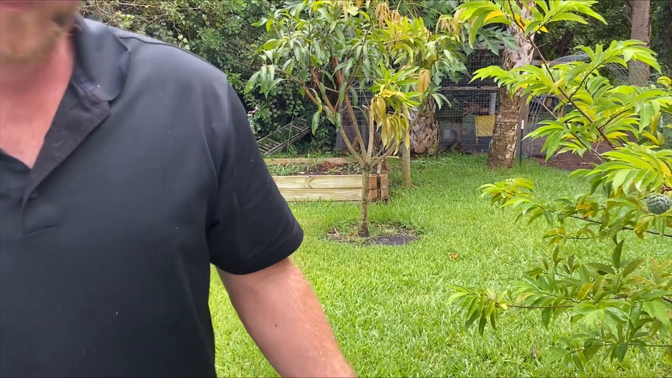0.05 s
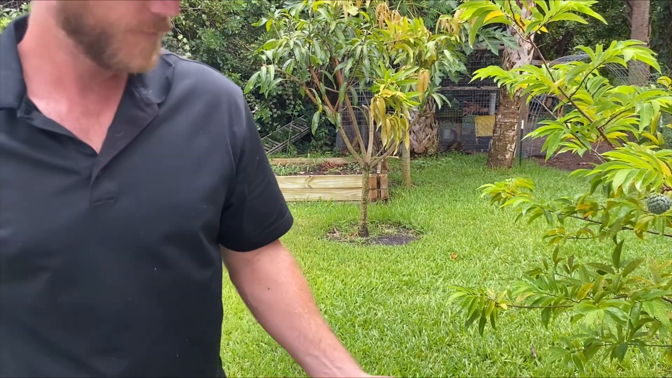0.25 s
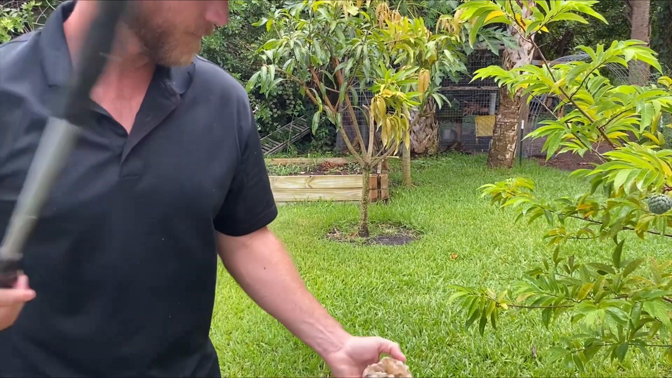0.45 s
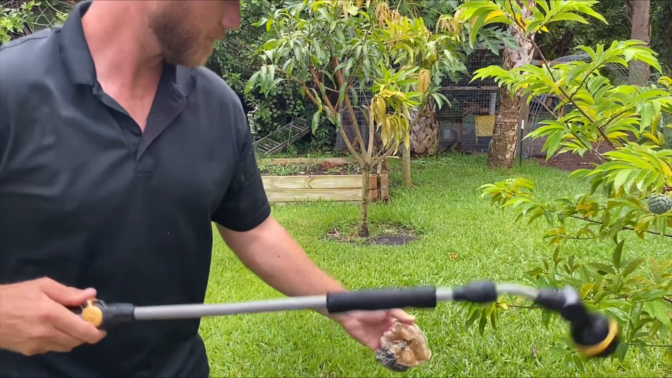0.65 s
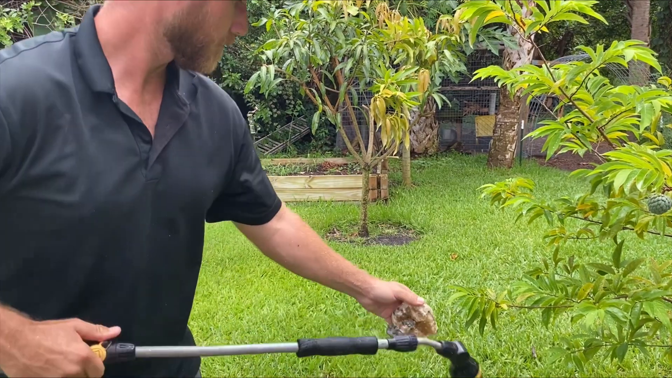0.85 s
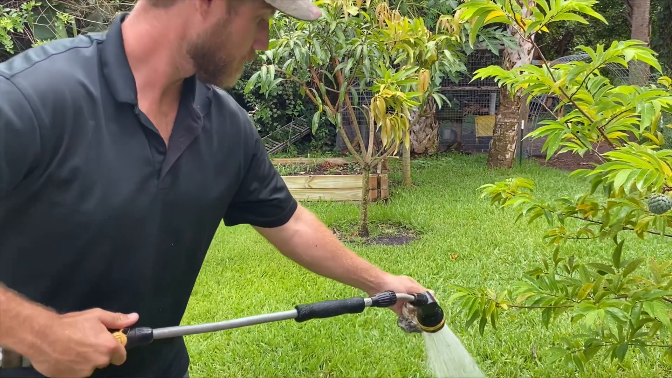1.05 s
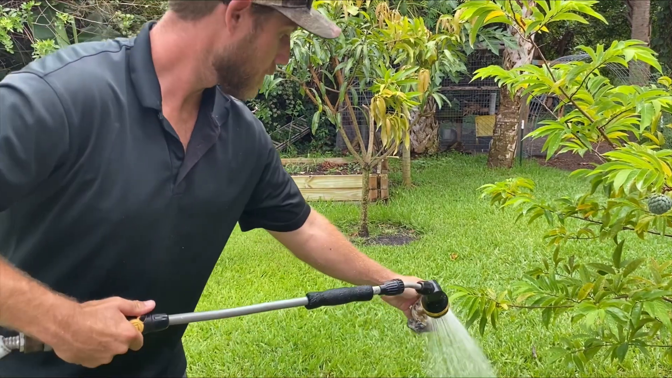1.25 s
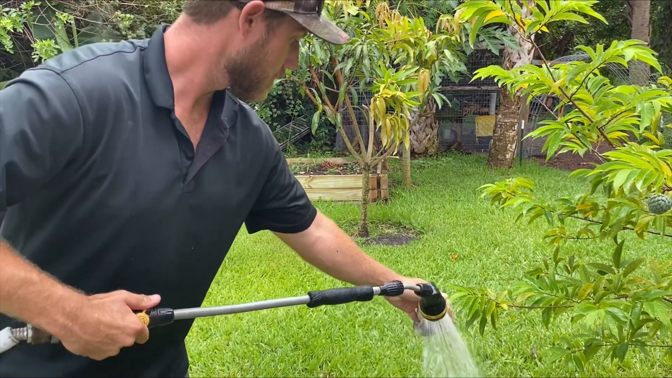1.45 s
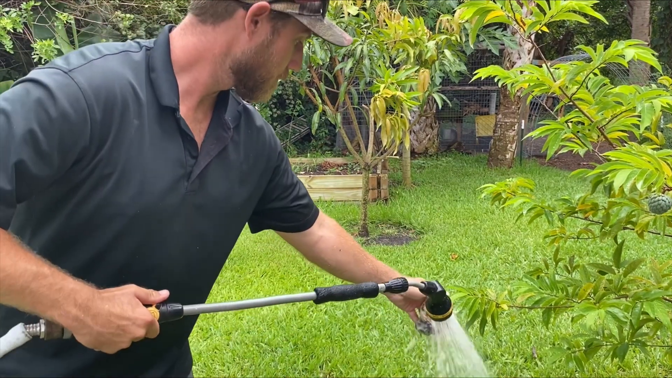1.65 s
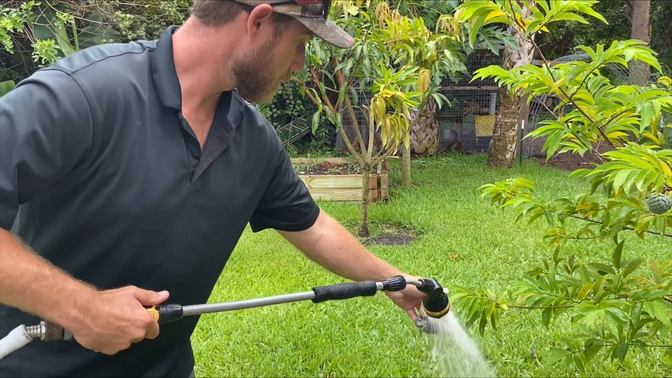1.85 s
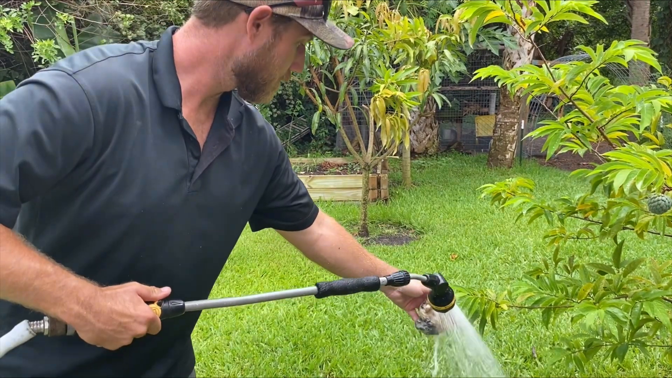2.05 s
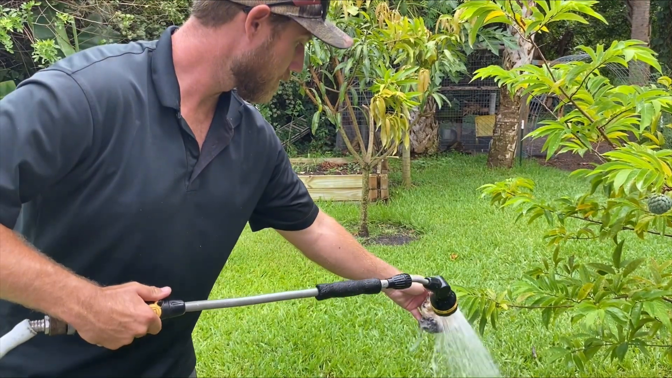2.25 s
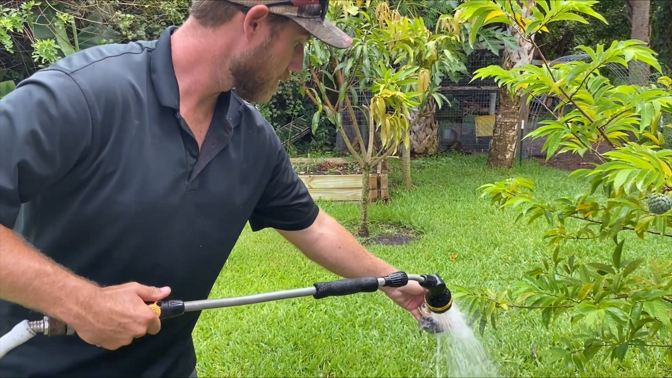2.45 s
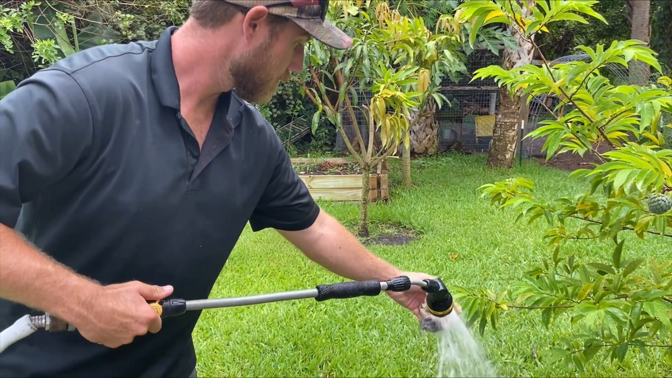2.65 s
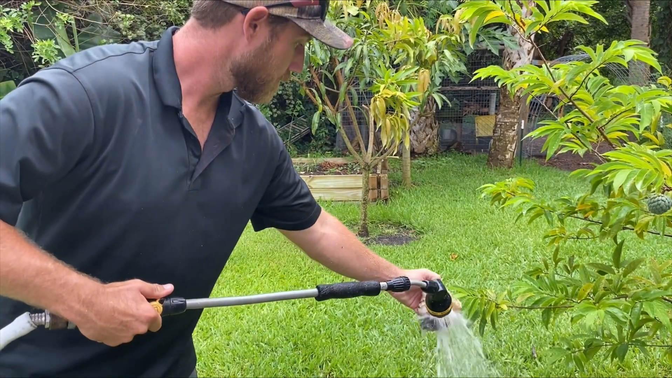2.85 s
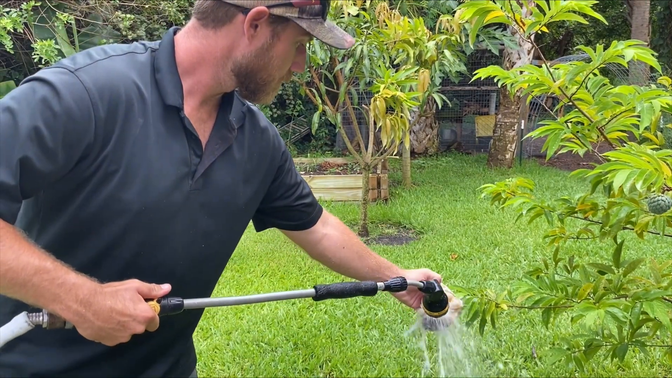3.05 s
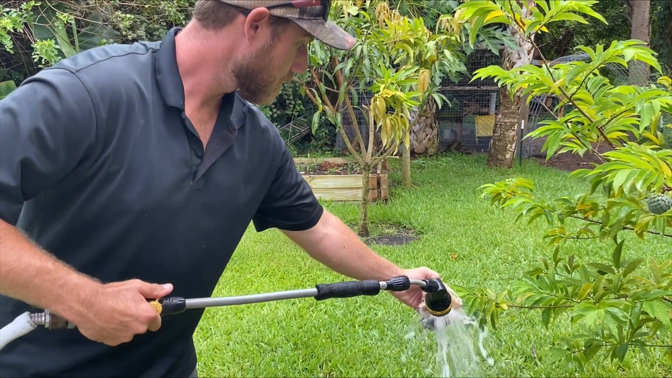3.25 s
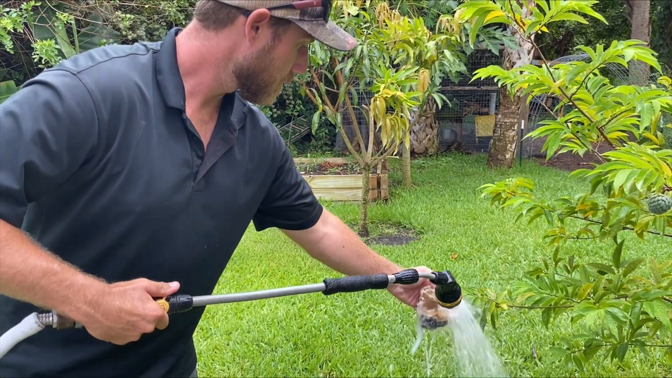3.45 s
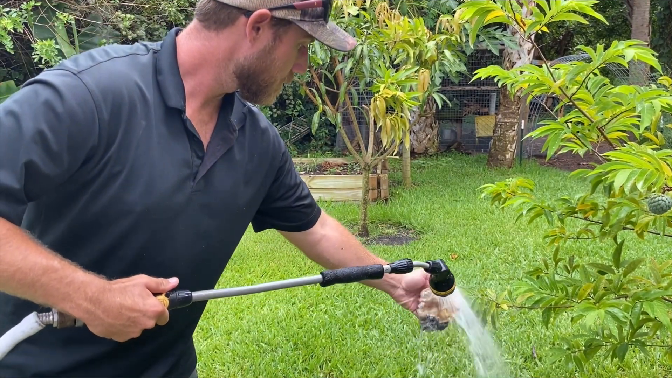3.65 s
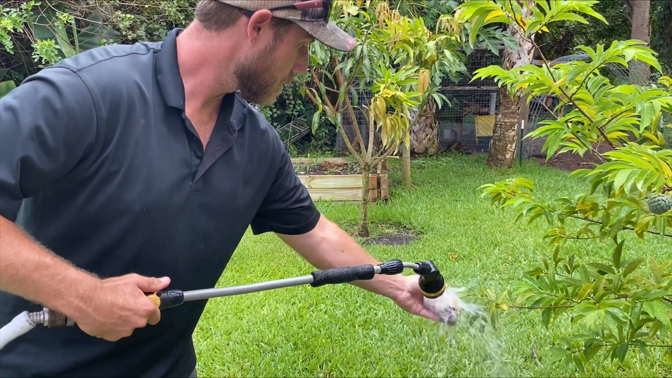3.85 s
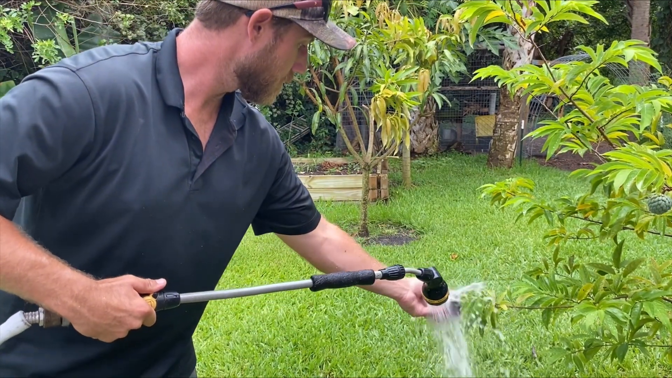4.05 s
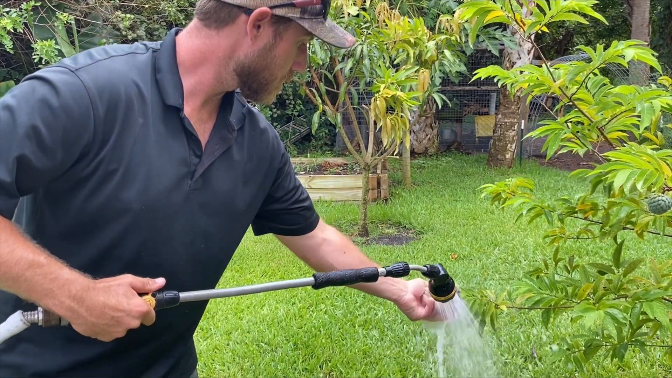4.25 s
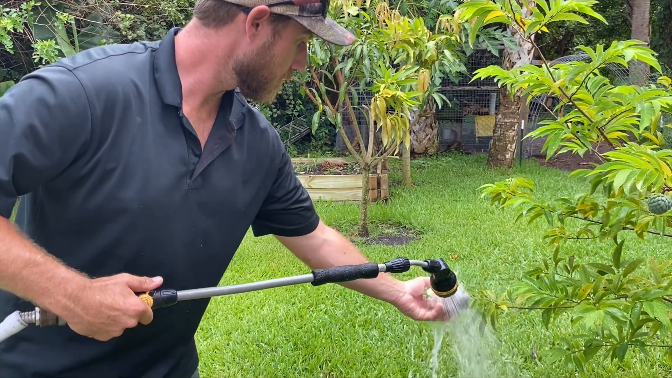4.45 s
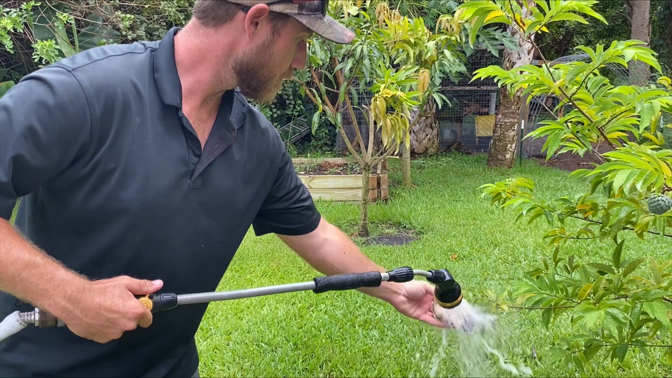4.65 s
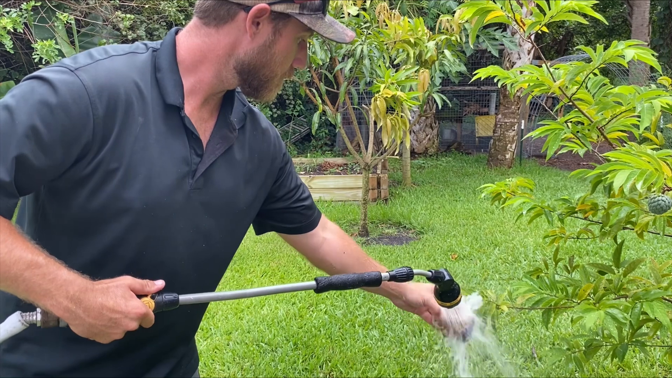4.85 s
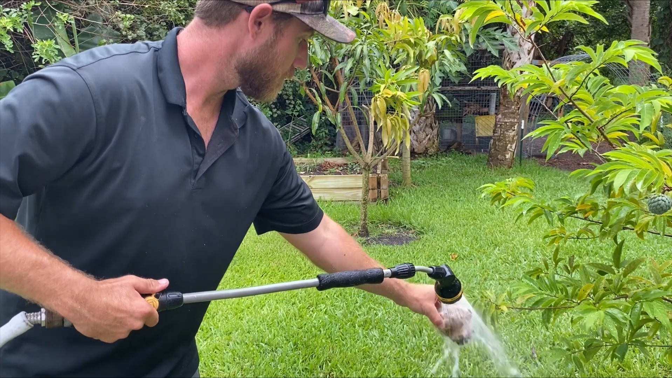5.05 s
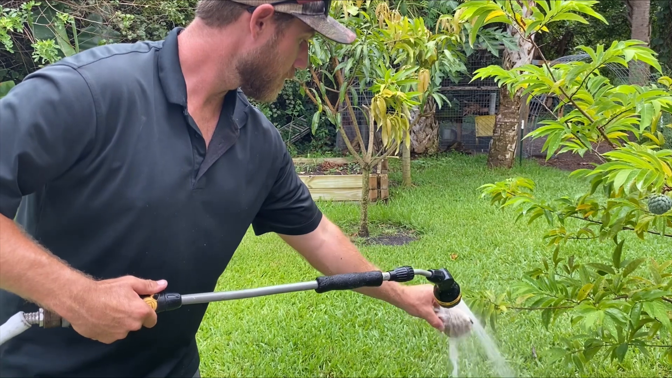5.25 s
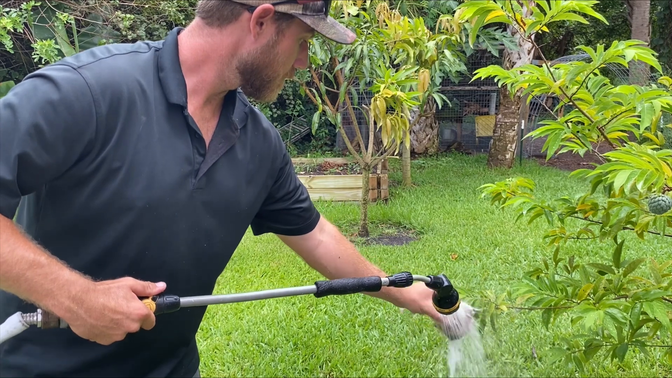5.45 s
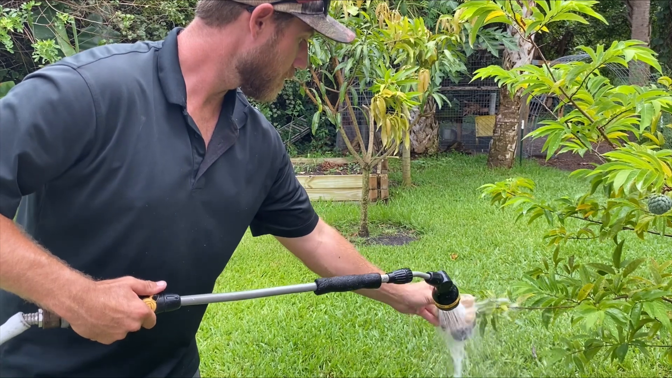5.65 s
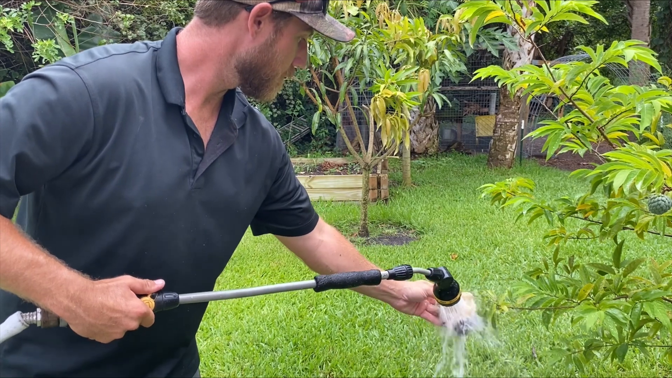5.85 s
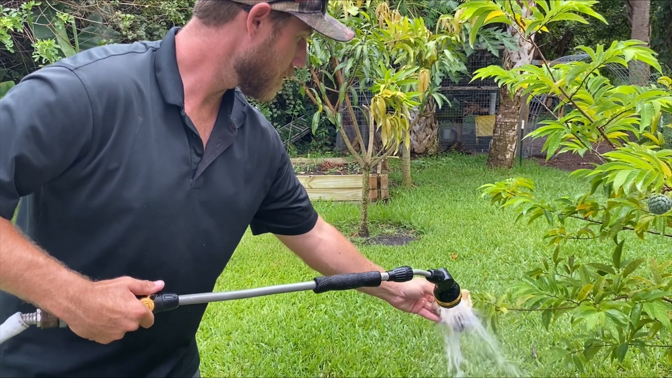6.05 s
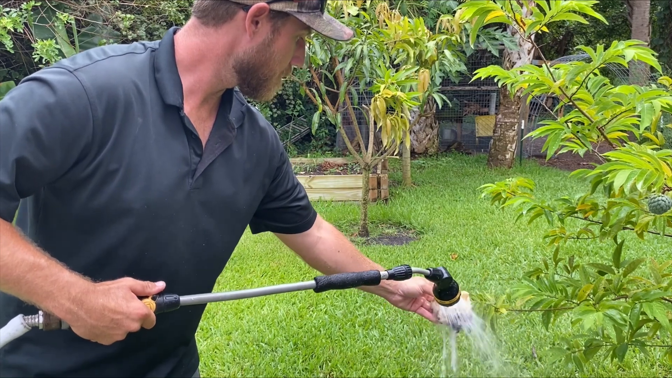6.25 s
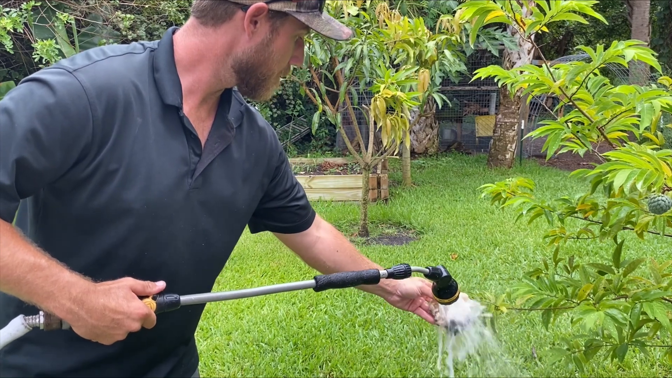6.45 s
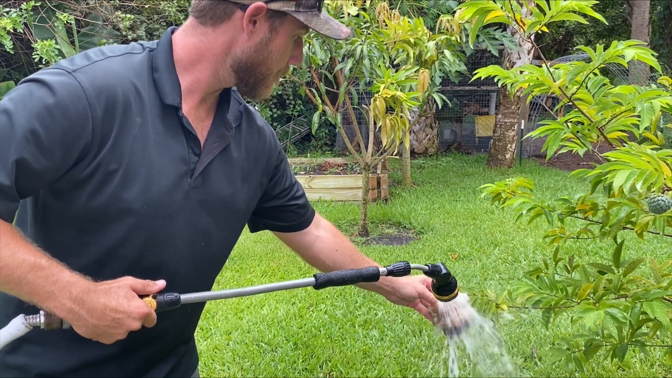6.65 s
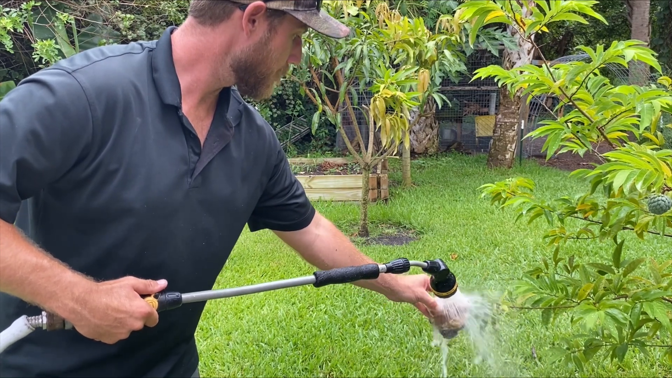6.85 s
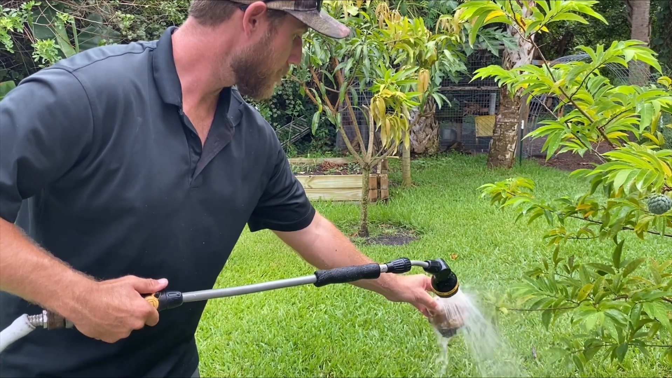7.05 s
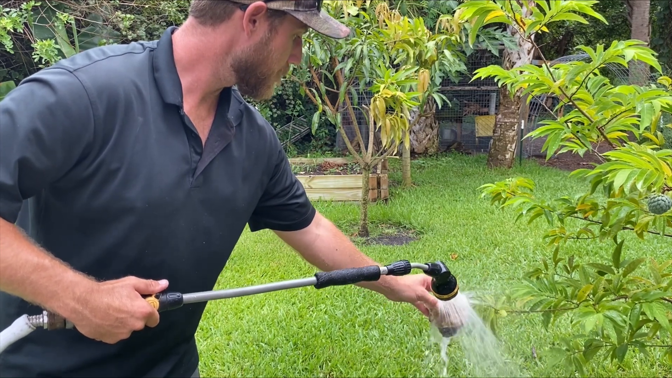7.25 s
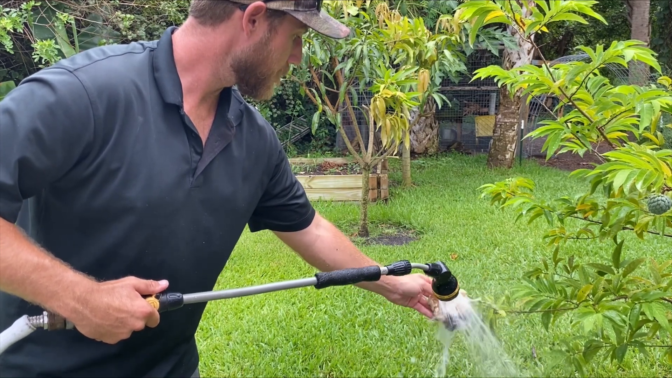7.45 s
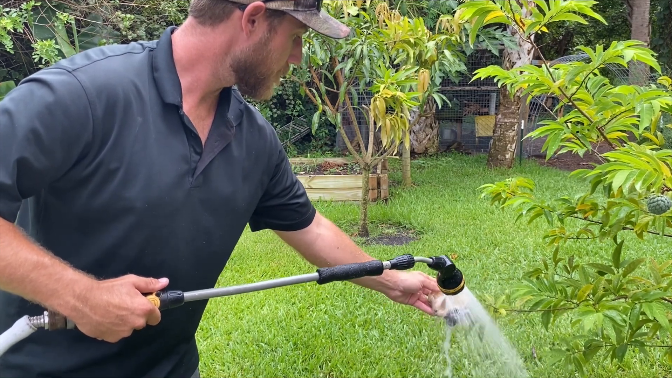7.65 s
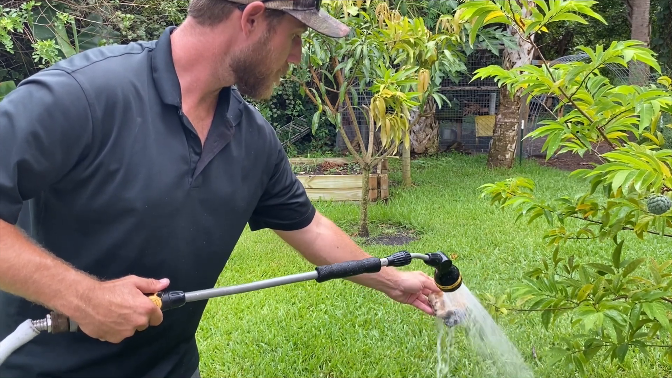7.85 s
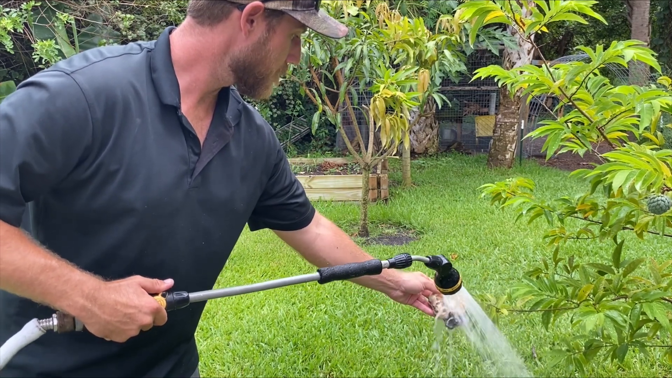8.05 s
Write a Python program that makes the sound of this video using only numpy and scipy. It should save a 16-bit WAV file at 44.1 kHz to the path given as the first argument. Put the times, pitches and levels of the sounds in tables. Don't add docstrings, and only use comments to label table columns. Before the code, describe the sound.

After soft lawn steps, trapped air spits and whistles from a hose wand, then a steady shower splashes unevenly over a hand, with pinging drops.

```python
import sys
import numpy as np
from scipy import signal
from scipy.fft import rfft, irfft, next_fast_len
from scipy.io import wavfile
from scipy.ndimage import uniform_filter1d, map_coordinates

SR = 44100
rng = np.random.default_rng(int(sys.argv[2]) if len(sys.argv) > 2 else 0)


def master_out(mix):
    frames = np.transpose(np.atleast_2d(mix))
    ceiling = np.clip(frames, -1, 1)
    pcm = np.round(ceiling * 32767).astype(np.int16)
    wavfile.write(sys.argv[1], SR, pcm)


def to_linear_factor(level_db):
    exponent = np.asarray(level_db, float) / 20
    return 10 ** exponent


N = 357210
SECONDS = np.arange(N) / SR
OPEN_S = 0.675
APART = np.array([[1], [-1]])


def unit(x):
    return x / np.sqrt(np.mean(x ** 2) + 1e-20)


def along(points, hz):
    f, v = np.transpose(points)
    return np.interp(np.log(hz + 1), np.log(f + 1), v)


def curves(rows):
    s, *cols = np.transpose(rows)
    return [np.interp(SECONDS, s, c) for c in cols]


def every_sample(v):
    return np.interp(np.arange(N), np.linspace(0, N, len(v)), v)


def wobble(rate):
    knots = rng.standard_normal(int(N * rate / SR) + 4)
    return map_coordinates(knots, [np.arange(N) * rate / SR])


def filtered(x, response):
    m = next_fast_len(N + 8192)
    return irfft(rfft(x, m) * response(np.fft.rfftfreq(m, 1 / SR)), m)[..., :N]


def coloured(pair, spectrum):
    return unit(filtered(pair, lambda hz: to_linear_factor(along(spectrum, hz))))


def patchy(patchy_db, size=(6, 8)):
    z = signal.stft(rng.standard_normal((2, N)), nperseg=512)[2]
    field = uniform_filter1d(rng.standard_normal(z.shape[1:]), size[0], axis=0)
    field = uniform_filter1d(field, size[1], axis=1)
    return unit(signal.istft(z * to_linear_factor(patchy_db * unit(field)), nperseg=512)[1][:, :N])


def impacts(count, spread_db, life_s):
    at, rank = rng.random((2, count))
    hits = np.bincount((at * N).astype(int), to_linear_factor(-spread_db * np.log(rank + .015)), N)
    return unit(signal.lfilter([1], [1, -np.exp(-1 / (life_s * SR))], hits))


def pings(rows, cycles, rise, onset, rough):
    out, k = np.zeros(N + 2048), np.arange(2048)
    grit = uniform_filter1d(rng.standard_normal(N + 2048), size=5) * 2
    for s, db, hz in rows:
        turns = hz * k / SR
        shape = np.exp(-turns / cycles) * (1 - np.exp(-turns / onset))
        tone = np.sin(2 * np.pi * turns * (1 + rise * turns))
        out[round(s * SR):][:2048] += to_linear_factor(db) * tone * shape
    return (out * (1 + rough * grit))[:N]


def bursts(starts, lengths, attack_s, release_s):
    t = np.arange(0, N, 32) / SR - np.array(starts)[:, None]
    return np.clip(t / attack_s, 0, 1) * np.clip(1 - (t - np.array(lengths)[:, None]) / release_s, 0, 1)


def total_db(floor_db, db, shapes):
    power = to_linear_factor(2 * floor_db) + to_linear_factor(2 * db) @ shapes ** 2
    return every_sample(10 * np.log10(power))


# (time [s], peak level [dB], frequency [Hz])
STALKS = [(0.048, -63, 2000), (0.0555, -45, 3600), (0.0774, -61, 1680), (0.1022, -52, 3040),
          (0.1172, -46, 2600), (0.1244, -49, 2900), (0.132, -52, 4300), (0.1502, -41.5, 2120),
          (0.174, -51, 4500), (0.2063, -55, 3500), (0.2166, -40.5, 2830), (0.227, -54, 3300),
          (0.24, -50, 1900), (0.258, -45, 3000), (0.287, -51, 1800), (0.2994, -52, 4660),
          (0.4335, -52, 1250), (0.516, -58, 2200), (0.059, -50, 5200), (0.064, -55, 8000)]
# (time [s], level [dB])
BRUSHING = [
    (0, -57),
    (.1, -58),
    (.2, -56),
    (.3, -55),
    (.38, -62),
    (.55, -67.5),
    (.67, -56.5),
]


def lawn():
    brush = patchy(2.5) * (.9 + .3 * impacts(count=3000, spread_db=2.5, life_s=.001))
    brush = coloured(brush, [(600, -1.0), (2500, -13.5), (6000, -8.0), (16000, -7.0)])
    snaps = pings(STALKS, cycles=1.1, rise=.06, onset=.25, rough=.3)
    overtones = np.multiply(STALKS, [1, 1, 1.7])
    snaps = snaps + .8 * pings(overtones, cycles=1.2, rise=.03, onset=.3, rough=.3)
    return to_linear_factor(curves(BRUSHING)[0] - 4) * brush * (SECONDS < OPEN_S) - to_linear_factor(1.5) * snaps


# (frequency [Hz], level [dB per Hz])
RUMBLE_SPECTRUM = [(16, -38), (28, -23), (54, 2), (86, -1.5), (140, -5), (199, -17.5), (330, -32),
                   (430, -44), (730, -120)]
TRAFFIC_DB, TRAFFIC_SWAY_DB = -55.5, -1.5


def traffic():
    level_db = TRAFFIC_DB + 4.0 + TRAFFIC_SWAY_DB * wobble(5.4)
    return to_linear_factor(level_db) * coloured(patchy(0.13), RUMBLE_SPECTRUM)


# (time [s], frequency [Hz], peak level [dB])
ENGINE_SWELLS = [(.17, 70, -52), (.52, 72, -50.5), (1.05, 72, -64), (1.22, 81, -54), (1.6, 74, -60),
                 (2.0, 75, -56), (2.92, 73, -52.5), (3.33, 65.5, -51.5), (3.7, 68, -55.5), (4.7, 60, -53.5),
                 (5.6, 68, -51.5), (6.4, 68, -54.5), (7.0, 68, -52), (7.6, 69, -55), (8.0, 70, -55)]
SWELL_S, IDLE_DB = .12, -56


def engine():
    s, hz, db = np.transpose(ENGINE_SWELLS)
    swells = np.exp(-((np.arange(0, N, 32) / SR - s[:, None]) / SWELL_S) ** 2)
    hz = np.interp(SECONDS, s, hz) + 2.26 * wobble(6)
    return to_linear_factor(total_db(IDLE_DB, db + 5.5, swells)) * np.sin(2 * np.pi * np.cumsum(hz) / SR)


# (time [s], level [dB])
FAN_LEVEL = [
    (0, -55),
    (.8, -54),
    (1.3, -53),
    (1.8, -69),
    (3.2, -57),
    (3.6, -67.5),
    (8.1, -64),
]


def fan():
    sway = 1 + .5 * wobble(8.9)
    hz = 127 + 2.52 * wobble(3.3)
    return to_linear_factor(curves(FAN_LEVEL)[0]) * sway * np.sin(2 * np.pi * np.cumsum(hz) / SR)


# (frequency [Hz], level [dB per Hz])
INSECT_SPECTRUM = [(6200, -26), (6700, -3), (7050, 7), (7350, -5), (7800, -42)]


def insects():
    level_db = -64.5 + 0.42 * wobble(49) + 0.36 * wobble(5.9)
    return to_linear_factor(level_db) * coloured(patchy(2.9), INSECT_SPECTRUM)


# (time [s], level [dB])
AIR_LEVEL = [
    (0, -65),
    (.35, -63.5),
    (.5, -70.5),
    (.65, -62),
    (1.0, -55),
    (1.3, -57),
    (8.1, -56),
]
# (frequency [Hz], level [dB per Hz])
AIR_SPECTRUM = [(150, 5), (350, -4.5), (860, -2), (1400, -5), (2400, -11), (5000, -19), (9000, -12.5),
                (16000, -29)]


def distant_air():
    return to_linear_factor(curves(AIR_LEVEL)[0]) * coloured(patchy(1.95), AIR_SPECTRUM)


def yard():
    return traffic() + (engine() + fan()) * np.array([[1], [.3]]) + insects() + distant_air()


# (start [s], length [s], strength [dB], wetness [dB], fine mist [dB])
AIR_SPURTS = [
    (0.669, 0.035, -39.5, -20, -13),
    (0.703, 0.029, -44, -7, -9),
    (0.736, 0.015, -48, 1, -6),
    (0.754, 0.031, -41, -4, -12),
    (0.789, 0.026, -43.5, -3.5, -15),
    (0.819, 0.047, -51, -4, -19),
    (0.908, 0.04, -51.5, -2.5, -15),
    (0.988, 0.23, -55, -15, -21),
]
SPURT_ATTACK_S, SPURT_RELEASE_S = 0.0017, 0.012


def with_spurts(db, offset):
    start, length, strength_db, wet_db, fine_db = np.transpose(AIR_SPURTS)
    spurts = bursts(start, length, SPURT_ATTACK_S, SPURT_RELEASE_S)
    spurt_db = total_db(-99, strength_db + offset(wet_db, fine_db), spurts)
    return 10 * np.log10(to_linear_factor(2 * db) + to_linear_factor(2 * spurt_db))


# (time [s], level [dB])
JET_FLOW = [(0.95, -60), (0.97, -64), (1.49, -51.5), (1.95, -55.5), (2.62, -52.5), (4.0, -48.5),
            (4.08, -52), (4.65, -45), (4.79, -50), (4.87, -45), (5.17, -49.5), (5.87, -44.5), (6.03, -48.5),
            (6.98, -46.5), (7.02, -49.5), (7.5, -48.5), (7.78, -50.5), (8.1, -48)]
# (start [s], length [s], mist change [dB], spray change [dB])
OBJECT_TILTS = [(.94, 0.036, 0, 2), (1.13, 0.22, 2.5, 1.5), (1.356, 0.036, -3, 1.5), (1.524, 0.057, 4, 2),
                (1.72, 0.12, 1.5, -3), (2.03, 0.13, 4, -1), (2.38, 0.15, 2.5, -4.5), (2.92, .1, -1, 3),
                (3.06, 0.088, -1.5, 0), (3.36, .05, 1, 1), (3.496, 0.064, -2, -4), (3.7, 0.22, 0, 4),
                (4.06, .09, 2, 0), (4.18, .05, -0.5, -2), (4.48, 0.18, -1, 2.5), (5.07, .06, 0.5, -2),
                (5.15, .24, 0, 0), (5.583, 0.099, -2.5, -4), (6.22, .07, 2, -2), (6.52, 0.11, 0, 1),
                (6.765, 0.22, 1, -0.5), (7.24, .04, 1, -2), (7.345, .04, 3.5, 0), (7.42, .09, -1, 0),
                (7.857, 0.11, 0.5, 1.5)]
FULL_FLOW_DB, USUAL_SPLASH_DB, TILT_EASE_S = -47, -48, 0.023
MIST_DB, MIST_FOLLOWS_SPLASH = -48.5, 0.096
SPRAY_DB, SPRAY_FOLLOWS_FLOW, SPRAY_FOLLOWS_SPLASH = -51, 0.19, 0.4


def breakup_levels(splash_db):
    flow_db = curves(JET_FLOW)[0] - FULL_FLOW_DB
    extra_db = splash_db - USUAL_SPLASH_DB
    start, length, *tilt_db = np.transpose(OBJECT_TILTS)
    tilt_db = tilt_db @ bursts(start, length, TILT_EASE_S, TILT_EASE_S)
    mist_db = MIST_DB + flow_db + MIST_FOLLOWS_SPLASH * extra_db + every_sample(tilt_db[0])
    spray_db = SPRAY_DB + SPRAY_FOLLOWS_FLOW * flow_db + SPRAY_FOLLOWS_SPLASH * extra_db
    spray_db = spray_db + every_sample(tilt_db[1])
    return with_spurts(mist_db, lambda wet, fine: fine), with_spurts(spray_db, lambda wet, fine: 0)


# (frequency [Hz], level [dB per Hz])
MIST_SPECTRUM = [(300, -21), (1000, -25.5), (2000, -10.5), (3500, -7.5), (6500, -6.5), (8600, -0.5),
                 (11500, -0.5), (14000, 3), (17000, 3)]


def mist(level_db):
    grains = 5.0 + 0.8 * impacts(count=12000, spread_db=3.0, life_s=0.0003)
    return to_linear_factor(level_db + 12.0) * coloured(patchy(1.7) * grains, MIST_SPECTRUM)


# (frequency [Hz], level [dB per Hz])
SPRAY_SPECTRUM = [(2500, -36), (4500, -9), (5300, -0.5), (6400, -8), (7500, -4.5), (9500, -1.5),
                  (14000, -18)]


def spray(level_db):
    grains = 0.5 + 0.38 * impacts(count=6000, spread_db=4.5, life_s=0.002)
    return to_linear_factor(level_db + 3.5) * coloured(patchy(1.97) * grains, SPRAY_SPECTRUM)


# (start [s], length [s], splash level [dB], cup resonance [Hz])
OBJECT_DIPS = [(1.18, 0.14, -49.5, 3800), (1.315, 0.065, -45.5, 4060), (1.434, 0.027, -44, 3600),
               (1.603, 0.062, -43.5, 3820), (1.702, 0.18, -45.5, 3400), (2.011, 0.12, -45.5, 3560),
               (2.151, 0.057, -42, 3900), (2.273, 0.12, -44, 3650), (2.433, 0.25, -44, 3620),
               (2.66, 0.43, -44.5, 3470), (3.095, 0.23, -43, 3560), (3.392, 0.3, -52, 3650),
               (3.68, 0.11, -52.5, 3780), (3.764, 0.27, -46.5, 3200), (4.046, 0.15, -48.5, 3100),
               (4.248, 0.12, -48.5, 3720), (4.476, 0.25, -46, 3520), (4.763, 0.3, -51, 3400),
               (5.27, 0.1, -50, 3780), (5.473, 0.12, -51, 3440), (5.56, 0.29, -48, 3200),
               (5.847, 0.2, -47.5, 3400), (5.99, 0.17, -44.5, 3400), (6.15, 0.26, -44.5, 3180),
               (6.377, 0.32, -45.5, 3280), (6.685, 0.14, -59, 3800), (7.288, 0.1, -47.5, 3510),
               (7.367, 0.21, -47, 3500), (7.745, 0.22, -50.5, 3400), (7.844, 0.24, -48.5, 3400)]
# (start [s], length [s], level [dB], cup resonance [Hz])
WATER_SLAPS = [(1.343, 0.013, -48, 4200), (1.794, 0.077, -49, 3750), (1.879, 0.019, -42, 3800),
               (2.467, .04, -50, 3900), (2.596, 0.048, -46.5, 3500), (3.17, .03, -45, 3500),
               (3.31, .04, -48.5, 3800), (3.698, 0.031, -49, 3700), (3.938, .07, -51, 3760),
               (4.473, .01, -45.5, 3800), (4.561, 0.041, -44.5, 3400), (4.667, 0.037, -50, 3700),
               (4.943, 0.07, -50, 3500), (5.08, 0.044, -47, 3300), (6.267, 0.054, -43, 3230),
               (7.43, .05, -44.5, 3510), (7.89, 0.054, -48, 3500), (8.05, .04, -51, 3200)]
DIP_ATTACK_S, DIP_RELEASE_S, LONG_DIP_EASES = 0.02, 0.072, 0.092
SLAP_ATTACK_S, SLAP_RELEASE_S = 0.0078, 0.013
CLEAR_SPLASH_DB, CLEAR_CUP_HZ = -57, 3400


def splash_levels():
    start, length, dip_db, dip_hz = np.transpose(OBJECT_DIPS)
    ease_s = LONG_DIP_EASES * length[:, None]
    dips = bursts(start, length, DIP_ATTACK_S + ease_s, DIP_RELEASE_S + ease_s)
    start, length, slap_db, slap_hz = np.transpose(WATER_SLAPS)
    hits = np.vstack([dips, bursts(start, length, SLAP_ATTACK_S, SLAP_RELEASE_S)])
    splash_db = total_db(CLEAR_SPLASH_DB, np.append(dip_db, slap_db), hits)
    centre_hz = (np.append(dip_hz, slap_hz) @ hits + .1 * CLEAR_CUP_HZ) / (hits.sum(axis=0) + .1)
    return splash_db, every_sample(centre_hz)


# (time [s], delay [ms], share of direct sound)
LAWN_ECHO = [
    (1.0, 3.55, .45),
    (2.3, 3.51, .5),
    (3.0, 3.45, .35),
    (4.8, 3.36, .3),
    (6.2, 3.49, .3),
    (7.7, 3.75, .3),
]


def bounced(pair):
    delay_ms, share = curves(LAWN_ECHO)
    late = np.arange(N) - delay_ms * SR / 1000
    return pair + share * np.array([np.interp(late, np.arange(N), x) for x in pair])


# (frequency [Hz], level [dB per Hz])
OPEN_HAND = [(1180, -25.5), (2000, -11.5), (2160, -21), (2300, -9), (2430, -6.5), (2600, -4), (3320, -0.5),
             (3890, 1.5), (4390, 0), (4680, -5), (6110, -7), (10300, -120)]
CLOSED_HAND = [(1120, -21), (1900, -16), (2100, -3.5), (2250, 2), (2900, 3), (3560, -6.5), (4190, -4),
               (4700, -7), (6110, -25), (10300, -120)]


def splash(level_db, centre_hz):
    grains = 1.5 + .5 * impacts(count=5000, spread_db=-6.5, life_s=0.00044)
    slaps = patchy(1.47, size=(4, 6)) * grains
    opened = np.clip((centre_hz - 2900) / 800, 0, 1)
    ringing = (1 - opened) * coloured(slaps, CLOSED_HAND) + opened * coloured(slaps, OPEN_HAND)
    return bounced(to_linear_factor(level_db - 1.5) * ringing)


# (start [s], time to fill [s], fullest level [dB], depth [0-1])
PALM_POOLS = [(.98, 0.3, -60.5, 1), (1.422, 0.056, -54.5, 0.4), (1.73, 0.074, -57, 0.4),
              (2.03, 0.052, -56.5, 0.7), (2.32, 0.11, -55.5, 0.6), (2.55, .08, -56.5, 0.7),
              (2.68, 0.096, -53.5, 0.75), (2.8, 0.21, -53, 0.7), (3.0, 0.15, -52, 0),
              (3.76, 0.16, -53, 0.55), (4.0, 0.11, -60.5, 0.6), (4.3, 0.17, -59.5, .8),
              (4.9, 0.094, -60, 0.8), (6.02, 0.028, -56.5, 0.4), (6.14, 0.17, -52.5, 0.24),
              (7.36, 0.11, -56, 0.5), (7.75, 0.34, -60, .6), (8.0, .08, -55, 0.3)]
# (frequency [Hz], level [dB per Hz])
DEEP_POOL = [(300, -59), (850, -9.5), (1120, 3), (1700, -3.5), (2100, -2), (3000, -18.5)]
THIN_POOL = [(300, -55), (900, -24), (1300, 2), (1700, 4), (2100, -5), (3000, -17.5)]
FILL_SHARE, DRAIN_S = 0.43, 0.22
CLEAR_GURGLE_DB, SPURT_GURGLE_DB = -63, -12


def gurgle():
    start, length, pool_db, depth = np.transpose(PALM_POOLS)
    pools = bursts(start, length, FILL_SHARE * length[:, None], DRAIN_S)
    level_db = total_db(CLEAR_GURGLE_DB, pool_db, pools)
    level_db = with_spurts(level_db, lambda wet, fine: SPURT_GURGLE_DB)
    depth = every_sample((np.clip(depth, 0, 1) @ pools + .08) / (pools.sum(axis=0) + .1))
    bubbling = patchy(1.3, size=(3, 10)) * (1.5 + 0.2 * impacts(count=2500, spread_db=2, life_s=0.003))
    pool = depth * coloured(bubbling, DEEP_POOL) + (1 - depth) * coloured(bubbling, THIN_POOL)
    return to_linear_factor(level_db + 2.0) * pool


# (time [s], level [dB])
SLUG_LEVEL = [
    (.725, -75),
    (.734, -47),
    (.76, -54),
    (.795, -50),
    (.83, -75),
    (.9, -82),
]


def slug():
    thump = coloured(patchy(3.2), [(150, -8), (400, 0), (700, 3), (1200, -2), (2500, -40)])
    return to_linear_factor(curves(SLUG_LEVEL)[0]) * thump


def water():
    splash_db, centre_hz = splash_levels()
    mist_db, spray_db = breakup_levels(splash_db)
    splash_db = with_spurts(splash_db, lambda wet, fine: wet)
    surge = wobble(5.7) + 0.96 * wobble(30)
    jet = mist(mist_db) + spray(spray_db) + splash(splash_db, centre_hz) + gurgle()
    valve = np.clip((SECONDS - OPEN_S) / 0.00093, 0, 1)
    return (jet * to_linear_factor(0.58 * surge) + slug()) * valve


def breath(rate):
    return np.array([wobble(rate), wobble(rate)])


# (start [s], length [s], from frequency [Hz], to frequency [Hz], level [dB])
AIR_WHISTLES = [(.685, 0.037, 2380, 2760, -43), (0.695, 0.047, 5600, 6750, -38),
                (0.7, 0.03, 10700, 11600, -39), (0.723, 0.014, 3630, 3540, -41),
                (0.742, .04, 885, 1860, -47), (.757, .022, 2900, 4200, -44), (.803, .018, 5510, 5920, -40),
                (.682, .03, 1480, 1000, -46), (.757, .02, 6600, 7400, -42), (.835, .04, 1380, 1250, -51),
                (.855, .02, 4300, 4600, -48)]


def whistles():
    out = np.zeros((2, N))
    for s, span, from_hz, to_hz, db in AIR_WHISTLES:
        u = np.clip((SECONDS - s) / span, 0, 1)
        turns = span * (from_hz * u + (to_hz - from_hz) * u * u / 2)
        out += to_linear_factor(db) * np.sin(np.pi * u) * (.5 + 1.25 * breath(600)) * np.sin(2 * np.pi * turns)
    return out


# (time [s], frequency [Hz], level [dB])
TUBE_TONE = [(.95, 1107, -54), (1.05, 1135, -59.5), (2.5, 1126, -64.5), (4.05, 1149, -60.5),
             (4.2, 1290, -60), (4.6, 1285, -67), (5.1, 1288, -59.5), (6.0, 1291, -62.5), (6.9, 1295, -61.5),
             (7.3, 1291, -66.5), (8.1, 1300, -58.5)]


def tube():
    hz, db = curves(TUBE_TONE)
    rough = breath(170) + [[.6], [0]]
    return to_linear_factor(db) * (SECONDS > TUBE_TONE[0][0]) * rough * np.sin(2 * np.pi * np.cumsum(hz) / SR)


# (time [s], peak level [dB], frequency [Hz])
BIG_DROPS = [(0.9106, -46, 3870), (1.3484, -19, 4480), (1.6191, -30, 4100), (1.6432, -24, 3875),
             (1.8856, -25, 4300), (1.9489, -21.5, 4170), (2.1221, -36, 4390), (2.299, -34, 4230),
             (2.5426, -28, 4370), (2.7367, -44, 4227), (3.2754, -24, 3800), (3.399, -32, 5800),
             (3.5089, -30, 6600), (3.5633, -34, 3900), (3.7013, -30, 3540), (3.8716, -30, 7480),
             (4.0157, -25, 2410), (4.1524, -25.5, 2480), (4.9452, -29, 3860), (5.0858, -28, 3820),
             (5.5208, -25, 7300), (5.6139, -33.5, 2690), (5.8772, -28, 4340), (7.1207, -29.5, 2600),
             (7.1212, -32, 3400)]
# (time [s], peak level [dB], frequency [Hz])
FAT_DROPS = [
    (1.7515, -30.5, 1810),
    (2.662, -27, 2440),
    (3.076, -28, 3000),
    (3.149, -29, 1800),
    (3.887, -27, 2400),
    (4.283, -33, 1850),
    (6.97, -33, 2600),
    (6.037, -26, 2730),
    (6.3737, -36, 2650),
]


def drops():
    rings = pings([*BIG_DROPS, *FAT_DROPS], cycles=2.7, rise=0.0065, onset=1.1, rough=0.6)
    return to_linear_factor(-1.5) * rings * np.array([[1], [0]])


# (time [s], level [dB], frequency [Hz])
HEN_CLUCKS = [
    (4.421, -43, 960),
    (6.165, -50, 1360),
    (7.175, -48, 1460),
    (7.405, -47, 1415),
    (7.67, -43, 1420),
]


def hen():
    out = np.zeros(N)
    for s, db, hz in HEN_CLUCKS:
        u = np.clip(SECONDS - s, 0, .1)
        shape = u / .009 * np.exp(1 - u / .009)
        out += to_linear_factor(db) * shape * (.5 + wobble(450)) * np.sin(2 * np.pi * hz * u * (1 - 2.5 * u))
    return out * np.array([[-.55], [1.05]])


# (frequency [Hz], left lead [half turns])
PORT_LEAD = [(4100, 0), (5900, -.9), (6500, -1.8), (7100, -2.24), (8000, -2.53), (9080, -3), (13320, -5),
             (15450, -6.1)]
# (frequency [Hz], left-right likeness [0-1])
PORT_LIKENESS = [(100, .96), (350, .52), (750, .22), (1150, .78), (1650, .8), (2000, .88), (2250, .993),
                 (3900, .992), (6300, .45), (7500, .84), (8400, .999)]
# (frequency [Hz], left minus right [dB])
PORT_TILT = [(60, -1.3), (150, -2), (350, -.7), (1400, -.9), (2200, 0), (4100, 0), (5200, 2.4), (7100, 2.3),
             (8500, 0)]
CLING = .66


def ports(pair):
    def read(points, hz):
        return np.interp(hz, *np.transpose(points))

    def blend(hz):
        angle = np.arccos(np.clip(read(PORT_LIKENESS, hz), -1, 1)) / 2
        return np.array([np.cos(angle), np.sin(angle)])

    def lag_and_tilt(hz):
        lead = read(PORT_LEAD, hz)
        lead = lead - CLING * (hz > 6700) * np.sin(2 * np.pi * lead) / (2 * np.pi)
        half = np.exp(.5j * np.pi * lead) * to_linear_factor(read(PORT_TILT, hz) / 2)
        return np.array([half, 1 / half])

    mid, side = filtered(pair, blend)
    return filtered(np.array([mid + side, mid - side]), lag_and_tilt)


def scene():
    steps, jet = lawn(), water()
    swing = np.interp(SECONDS, [.83, 1.3], [1, 0])
    aside = 1.6 * steps * np.array([[1], [-.3]]) + 0.5 * swing * jet[1] * APART
    aside = filtered(aside, lambda hz: 1 / (1 + (hz / 4200) ** 6))
    heard = ports(jet + whistles() + tube() + steps + yard() + drops())
    unlike = filtered(heard[0] - heard[1], lambda hz: np.exp(-((hz - 6000) / 1700) ** 4)) / 2
    in_step = .6 * swing * (SECONDS > OPEN_S) * unlike * APART
    faint = filtered(unlike, lambda hz: np.exp(-((hz - 5800) / 800) ** 2)) * (SECONDS < OPEN_S)
    in_step += .8 * faint * APART
    return heard - in_step + 1.3 * faint + hen() + aside


def roll_off(x):
    return signal.sosfilt(signal.butter(12, 17100, fs=SR, output="sos"), x)


def record(dry):
    mix = filtered(dry, lambda hz: (hz < 15740) / (1 + (36 / (hz + 1)) ** 4))
    return roll_off(mix)


dry = scene()
out = record(dry)
master_out(out)
```